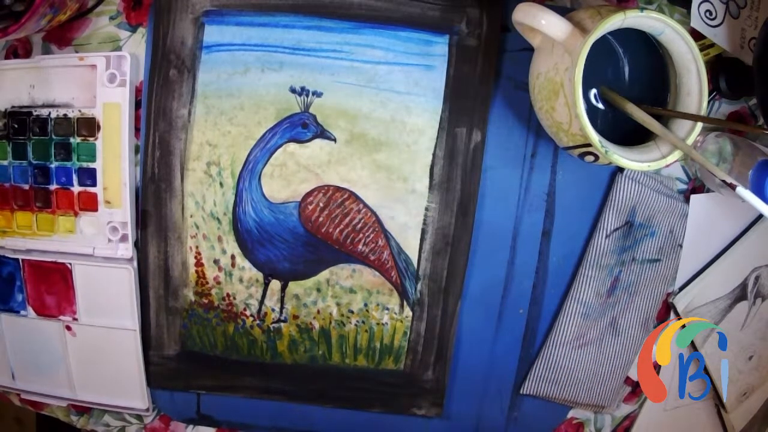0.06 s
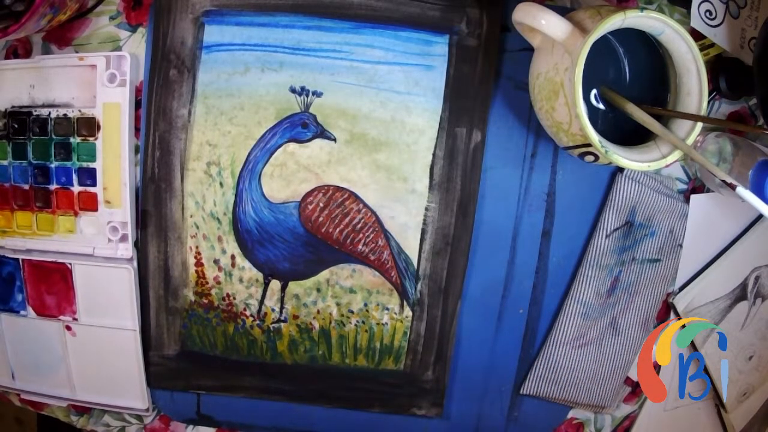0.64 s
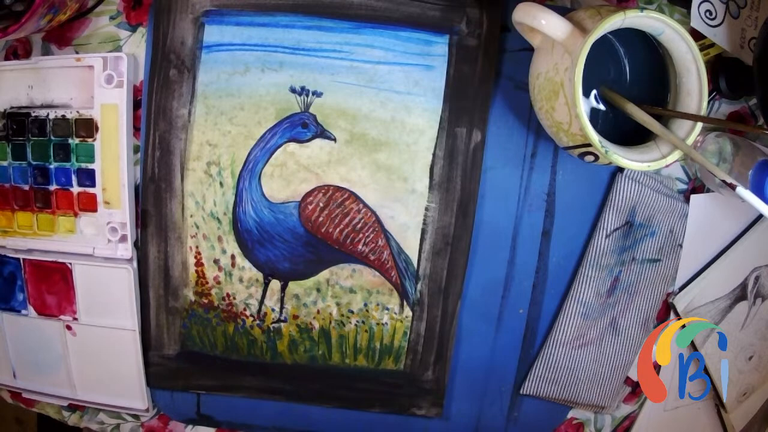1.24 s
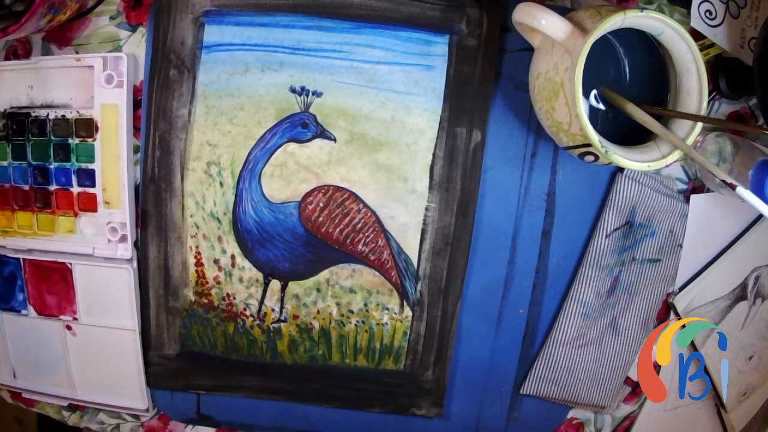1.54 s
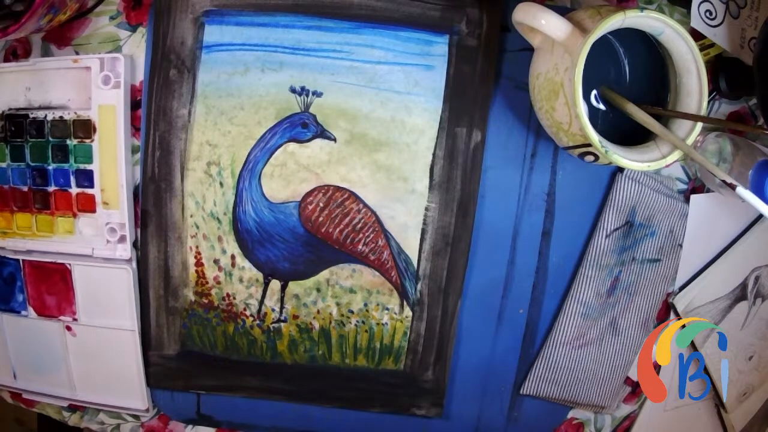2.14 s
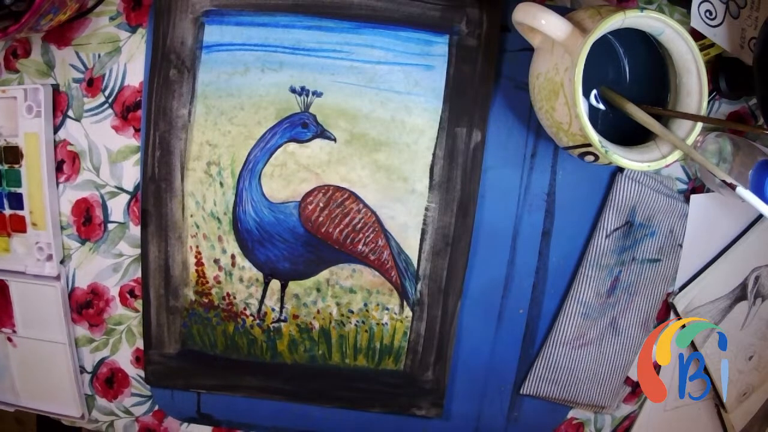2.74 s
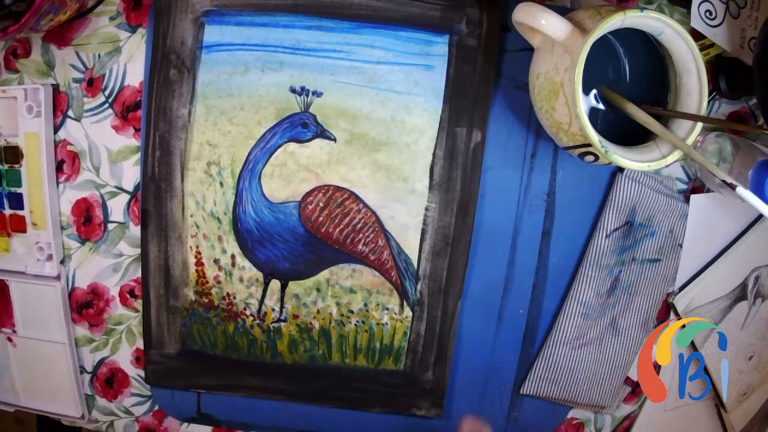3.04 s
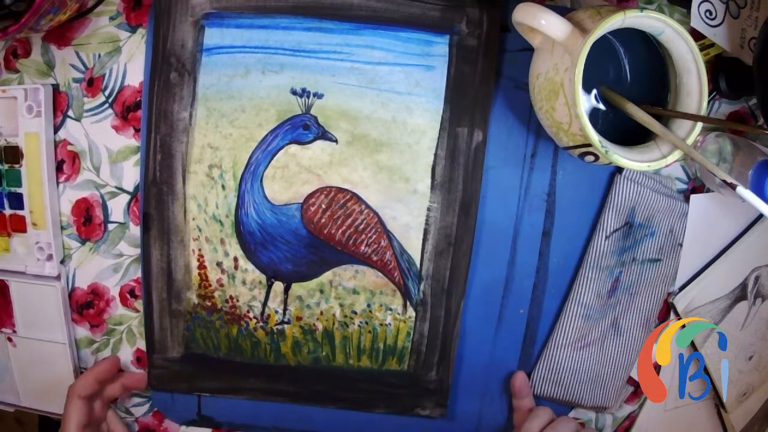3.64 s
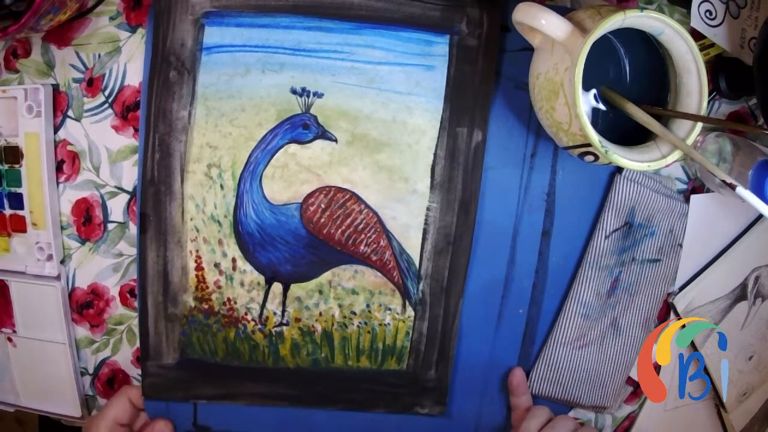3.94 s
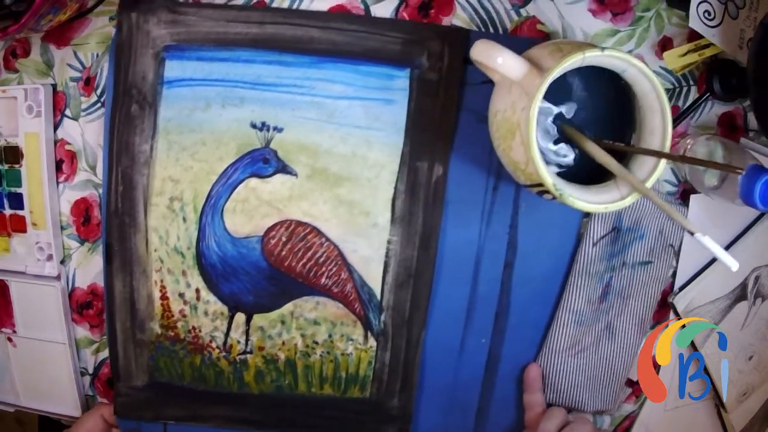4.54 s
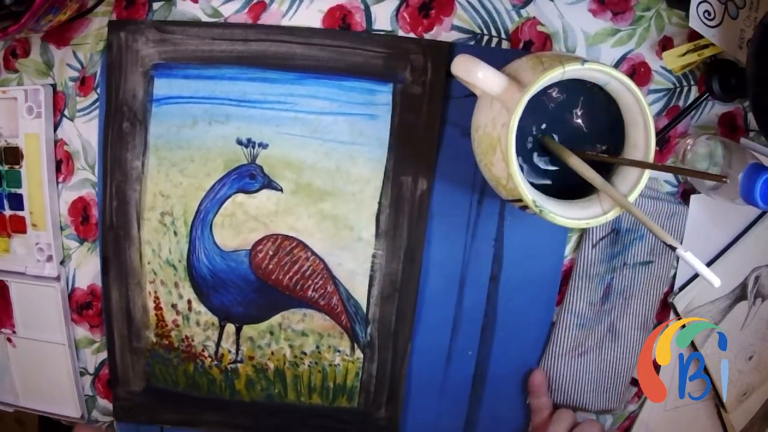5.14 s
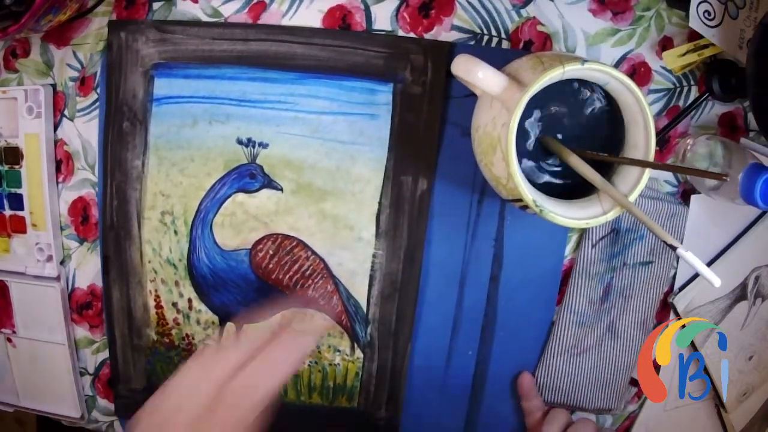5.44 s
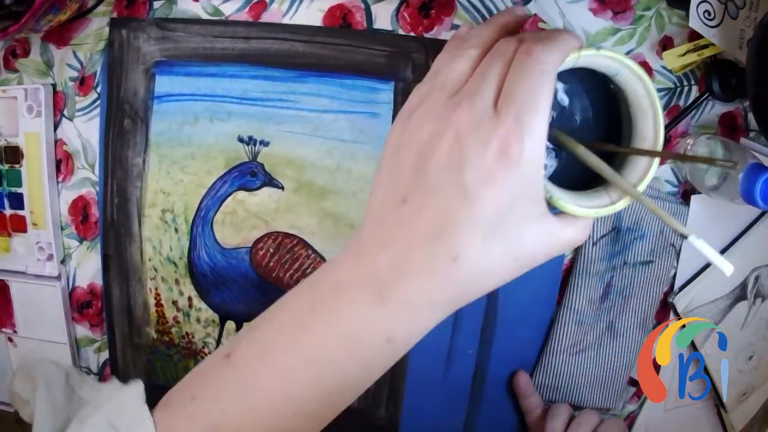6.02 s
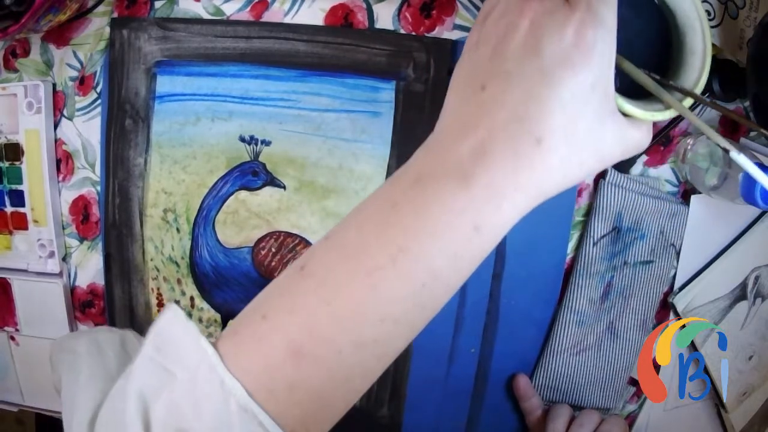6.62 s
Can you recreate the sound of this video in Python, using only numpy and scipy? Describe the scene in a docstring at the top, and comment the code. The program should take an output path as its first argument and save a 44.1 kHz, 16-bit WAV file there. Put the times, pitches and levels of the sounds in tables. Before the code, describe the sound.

Steady low room noise and a faint, thin, rapid chirping run throughout in a small room. At about 0.4 seconds something hollow thumps softly on a cloth-covered table, a faint metal ping follows, and at 0.7 a plastic palette knocks and clicks. Small ticks, finger rubs and a quiet slide continue, with a light tap at 2.5. A wooden board is knocked at 3.2 and 3.4, then slides unevenly over the cloth from 3.9 to 4.8, with sharp taps at 4.4 and 4.6. The pushes sway the microphone stand, adding a deep rumble, strongest around 4.7 and after 6. Cloth rustles at 5.9 as a mug of water is lifted. Brush handles clack against its rim at 6.15, then loudest at 6.3 with a thud. A few small water plops follow around 6.4, and light clicks finish near 6.7.

```python
"""Painting things are moved on a cloth-covered table in a small room, over steady noise and thin chirping.
From the start, each push thuds in the table and sways a springy camera stand. Fingers rub, something
hollow thumps and metal pings; a plastic palette is nudged, then tapped. A wooden board is gripped and
slid, the cloth catching and slipping under it. Last, a mug of water is lifted: brush handles excite
the modes of its rim, and pockets of air ring in the water as plops."""
import sys
import numpy as np
from scipy import signal
from scipy.fft import rfft, irfft
from scipy.io import wavfile

SR = 44100
rng = np.random.default_rng(int(sys.argv[2]) if len(sys.argv) > 2 else 0)


def store_pcm(level_fs):
    """Save levels as 16-bit WAV."""
    pcm = np.round(np.clip(level_fs, -1, 1) * 32767).astype(np.int16)
    wavfile.write(sys.argv[1], SR, np.atleast_2d(pcm).T)


N = 303408
T = np.arange(N) / SR
TOP_HZ = 16200

# Levels are relative within each column.
# spectrum of the room noise: frequency_hz, level_db
ROOM_SPECTRUM = [(60, 5.5), (110, 1.5), (220, -6), (350, -6), (460, -12), (800, -5.5), (1000, -13),
                 (1350, -14), (2000, -26.5), (3300, -31), (5800, -33.5), (9000, -43), (12000, -33.5),
                 (15000, -32)]
# resonances in that noise: centre_hz, width_hz, gain_db
ROOM_RESONANCES = [(400, 110, 0), (523.3, 19, 7.5), (1250, 230, -4.5), (2620, 710, 8.5), (4000, 270, 4)]
# hands pushing on the table: start_s, held_s, sway_db, thud_db
PUSHES = [(0, 0.13, -36, -49), (0.364, 0.17, -42.5, -34), (.716, 0.14, -29.5, -23.5),
          (1.415, 0.12, -44, -40.5), (1.831, 0.023, -46.5, -40), (2.231, 0.13, -36, -45.5),
          (2.678, 0.036, -40, -54), (3.191, 0.065, -36.5, -27), (3.341, 0.1, -34, -46),
          (3.926, 0.13, -31, -46), (4.059, 0.13, -24, -32.5), (4.33, 0.11, -22.5, -42),
          (4.703, 0.07, -16.5, -37), (5.61, 0.044, -42.5, -62), (5.801, 0.044, -39.5, -59),
          (6.09, 0.022, -23, -23), (6.303, 0.031, -20.5, -19.5)]
# spectrum of the table's rumble: frequency_hz, level_db
RUMBLE_SPECTRUM = [(20, -7.5), (55, -8), (80, -14.5), (130, 0.5), (250, -20), (600, -34.5), (2000, -105.5)]
# knocks on board and table: start_s, level_db, cutoff_hz, contact_s
KNOCKS = [(.3595, -44.5, 710, 0.0018), (0.7125, -36, 1380, 0.00062), (0.723, -39.5, 1200, 0.0062),
          (0.741, -37, 3000, 0.0061), (1.501, -43, 400, 0.071), (3.1832, -30.5, 820, 0.0021),
          (3.196, -27.5, 302, 0.01), (3.398, -35.5, 1700, 0.018), (3.417, -36, 1100, 0.016),
          (4.37, -44, 2500, .001), (4.404, -43, 2500, 0.00082), (4.6143, -39, 3000, .00042),
          (4.6354, -37, 2200, 0.001), (4.699, -41, 1780, 0.00081), (4.753, -45.5, 2000, .00064),
          (6.057, -39.5, 1310, 0.0091), (6.149, -42, 300, .004), (6.309, -28.5, 498, 0.012)]
# palette and board sliding on cloth, and the noisy fading tails after the palette knock
# and the loud mug clack: start_s, held_s, body_db, hiss_db
SLIDES_AND_TAILS = [(.56, 0.16, -66, -76.5), (.725, 0.053, -49.5, -81), (1.98, 0.65, -70.5, -81),
                    (3.6, 0.064, -69, -73), (3.9, 0.17, -57, -71.5), (4.02, 0.13, -54, -72.5),
                    (4.13, 0.26, -62.5, -77.5), (4.32, 0.16, -57.5, -72.5), (4.59, 0.16, -56.5, -72),
                    (4.8, 0.26, -71, -83.5), (5.58, 0.25, -72, -81), (5.92, .36, -54, -72),
                    (6.3, 0.15, -56.5, -63.5), (6.55, 0.14, -62, -76.5), (6.821, 0.08, -63, -80)]
# low and high spectra of that noise: frequency_hz, level_db
BODY_SPECTRUM = [(60, 27.5), (150, 18.5), (300, 6.5), (600, -0.5), (1200, 1.5), (2100, -1.5), (3500, -7.5),
                 (6000, -27), (10000, -34.5)]
HISS_SPECTRUM = [(2000, -3.5), (4000, 8.5), (6000, 6.5), (9000, 7), (12000, -0.5), (15500, -7.5)]
# strokes of fingers and sleeve: middle_s, level_db, centre_hz, half_length_s
RUBS = [(0.336, -66.5, 784, 0.064), (1.033, -64, 1040, 0.031), (1.512, -59, 745, 0.069),
        (1.71, -66, 900, 0.02), (1.84, -66, 1400, 0.0085), (3.306, -68, 2190, .03), (3.4, -56, 1960, 0.015),
        (3.64, -65.5, 1990, 0.062), (3.682, -61.5, 1570, 0.032), (3.767, -69, 2140, 0.015),
        (5.97, -56, 255, 0.027), (6.034, -59, 1970, 0.057)]
# ticks of palette, board edge and small things: start_s, level_db, centre_hz, decay_s
TICKS = [(0.743, -34.5, 4300, 0.0042), (0.755, -36.5, 3600, 0.0062), (0.774, -53, 3480, 0.014),
         (1.592, -42, 5900, 0.0013), (1.605, -51, 6000, 0.0024), (1.71, -56.5, 9000, 0.0031),
         (1.834, -52, 7240, 0.0075), (2.103, -58, 12000, 0.0018), (2.797, -57, 8900, 0.0014),
         (3.194, -56.5, 4030, .008), (3.406, -57.5, 8000, 0.025), (4.074, -44.5, 5000, 0.003),
         (4.3675, -27.5, 1200, 0.0042), (4.369, -41, 5970, 0.0019), (4.615, -20.5, 1090, 0.0022),
         (4.6158, -32.5, 5450, 0.0013), (4.632, -22.5, 1090, 0.0037)]
# air pockets in the water: start_s, level_db, settled_pitch_hz, start_pitch_hz, t60_s
PLOPS = [(4.6912, -34.5, 1840, 1800, 0.015), (6.377, -24, 960, 1490, 0.033),
         (6.4121, -32.5, 966, 1880, 0.085), (6.4493, -33.5, 1030, 1110, 0.041),
         (6.4709, -35.5, 990, 1190, 0.029)]
# brush handles striking the mug: start_s, level_db, treble_gain_db, chatter_s
CLACKS = [(6.1475, -20.5, 1.5, 0.0024), (6.1505, -18.5, -24, 0.0039), (6.1563, -14, -22, 0.00055),
          (6.18, -32, -13, 0.00097), (6.2786, -22, -20.5, 0.00082), (6.3072, -5.5, 0.5, 0.00029),
          (6.4197, -27.5, 6, 0.0014), (6.438, -35, -4.5, 0.0017), (6.462, -46, -0.5, 0.0019),
          (6.6835, -40, 7, 0.0033), (6.691, -43, -0.5, 0.0025)]
# normal modes of each struck body: frequency_hz, level_db, t60_s
BOARD_MODES = [(84.4, -3, 0.19), (134.6, -6.5, 0.24), (177, -3.5, 0.06), (260.7, -4.5, 0.1),
               (384, -2.5, 0.048), (596, -3, 0.025), (830, -8.5, 0.051), (1060, 1, 0.016),
               (1277, -4.5, .028), (1502, -8, 0.034), (1968, -6, 0.048), (2520, -15.5, 0.015),
               (2706, -8, 0.064), (4444, -12, 0.015)]
HOLLOW_MODES = [(296, 9, 0.095), (337, 0.5, 0.32), (384, 5.5, 0.19), (476, 3, 0.064), (560, -7, 0.046)]
METAL_MODES = [(3060, -14, 0.47), (3560, -7.5, 0.25), (4750, -9.5, 0.4), (6630, -2, 0.11),
               (8242, 5.5, 0.13), (9916, -12, 0.16), (11600, -14, 0.11)]
PALETTE_MODES = [(1095, 2, 0.056), (1260, 1, 0.046), (1555, -4, 0.03)]
MUG_MODES = [(582, -21, 0.1), (646, -24.5, 0.098), (947, -21, 0.064), (1615, -5.5, 0.021),
             (1802, -10, 0.041), (1960, -31.5, 0.084), (2254, -12.5, 0.041), (2784, -24, 0.064),
             (2990, -23.5, 0.04), (3570, -23, 0.041), (4080, -13.5, 0.0086), (4702, -9, 0.007),
             (4930, -3.5, 0.0082), (5403, -6.5, 0.0098), (5880, -32.5, 0.047), (6490, -2.5, 0.014),
             (6900, -13.5, 0.013), (7490, -9.5, 0.0065), (8090, -0.5, 0.0077), (9060, -11.5, 0.026),
             (9200, -6.5, 0.012), (10020, -11, 0.017), (10930, -18.5, 0.022), (11980, -13.5, 0.011),
             (13326, -19.5, 0.01), (14387, -23, 0.014), (15300, -17, 0.009)]


def undb(db):
    """Decibels to amplitude ratio."""
    return 10 ** (np.asarray(db) / 20)


def unit(x):
    """Normalisation to rms 1."""
    return x / np.sqrt(np.mean(x ** 2))


def add(out, start_s, x):
    """Superposition: x joins out at start_s."""
    i = int(start_s * SR)
    out[i:i + len(x)] += x[:N - i]


def colour(x, spectrum):
    """Spectral shaping, to rms 1."""
    hz, db = np.transpose(spectrum)
    bins_hz = np.maximum(np.fft.rfftfreq(len(x), 1 / SR), 1)
    gain = undb(np.interp(np.log(bins_hz), np.log(hz), db))
    return unit(irfft(rfft(x) * gain, len(x)))


def band(x, hz, width_hz):
    """A single resonance, gain 1 at its centre."""
    quality = hz / min(width_hz, SR / 3)
    return signal.lfilter(*signal.iirpeak(min(hz, SR / 2 - 1000), quality, fs=SR), x)


def lowpass(x, hz):
    """Second-order low-pass."""
    return signal.sosfilt(signal.butter(2, min(hz, TOP_HZ), fs=SR, output="sos"), x)


def ring(modes, scatter_db=0.5):
    """Free vibration: a sum of damped modes, weighted a little differently by each blow."""
    hz, db, t60 = np.transpose(modes)[:, :, None]
    t = T[:SR // 2]
    polarity = (-1) ** np.arange(len(hz))[:, None]
    amplitude = polarity * undb(db + scatter_db * rng.standard_normal(hz.shape))
    return np.sum(amplitude * np.exp(-np.log(1000) * t / t60) * np.sin(2 * np.pi * hz * t), axis=0)


def burst(decay_s):
    """Exponentially decaying noise."""
    t = T[:SR // 4]
    return rng.standard_normal(len(t)) * np.exp(-t / decay_s)


def contact(decay_s, rough):
    """Impact force: one impulse, then tiny rebounds."""
    force = burst(decay_s)
    force *= rough / np.linalg.norm(force)
    force[0] += 1
    return force / np.hypot(1, rough)


def envelope(start_s, held_s, attack_s, fall_db_per_s):
    """Linear rise, hold and exponential decay."""
    rise = np.clip((T - start_s) / attack_s, 0, 1)
    return rise * undb(-fall_db_per_s * np.clip(T - start_s - held_s, 0, 2))


def room_noise():
    """Stationary noise, coloured by a few resonances."""
    noise = colour(rng.standard_normal(N), ROOM_SPECTRUM)
    peaks = sum(undb(db) * band(noise, hz, width) for hz, width, db in ROOM_RESONANCES)
    return undb(-63) * unit(noise + peaks)


def stand():
    """Damped oscillation: pushes sway the stand at two low resonances; the table rumbles along."""
    swing = undb(-52)  # at rest
    for start_s, held_s, db, _ in PUSHES:
        swing = np.hypot(swing, undb(db) * envelope(start_s, held_s, attack_s=0.019, fall_db_per_s=70))
    force = rng.standard_normal(N)
    sway = band(band(force, 36, 8.8), 41, 12) + undb(-2.5) * band(band(force, 30, 10), 30, 15)
    sway = swing * unit(sway / np.abs(signal.hilbert(sway)))  # swing alone sets the amplitude
    sway = signal.sosfiltfilt(signal.butter(4, 56, fs=SR, output="sos"), sway)
    rumble = colour(rng.standard_normal(N), RUMBLE_SPECTRUM)
    return sway + undb(-49.5) * swing ** 0.58 * rumble


def board(thud_cutoff_hz=150, thud_contact_s=0.021):
    """Impact excitation: knocks raise a crack and brief wooden modes; soft pushes give only a thud."""
    out = np.zeros(N)
    thuds = [(start_s, db, thud_cutoff_hz, thud_contact_s) for start_s, _, _, db in PUSHES]
    for start_s, db, cutoff_hz, contact_s in KNOCKS + thuds:
        wood = ring(BOARD_MODES, scatter_db=1.5)
        crack = undb(2) * lowpass(burst(0.0031), 5500) + undb(4) * lowpass(burst(0.017), 2000)
        add(wood, 0, crack)
        knock = signal.fftconvolve(wood, contact(contact_s, rough=0.59))
        add(out, start_s, undb(db - 6) * lowpass(knock, cutoff_hz))
    return out


def friction_and_tails(jerk_hz=45, jerk_db=0.5, catch_samples=48):
    """Stick-slip friction of cloth under palette and board; the same noise forms two impacts' tails."""
    body, hiss = undb(-81.5), undb(-89)  # faint rustle between moves
    jerks = undb(jerk_db * unit(lowpass(rng.standard_normal(N), jerk_hz)))
    for start_s, held_s, body_db, hiss_db in SLIDES_AND_TAILS:
        gain = jerks * envelope(start_s, held_s, attack_s=0.31 * held_s, fall_db_per_s=196)
        body = np.hypot(body, undb(body_db) * gain)
        hiss = np.hypot(hiss, undb(hiss_db) * gain)
    catches = np.repeat(rng.standard_normal(N // catch_samples + 1), catch_samples)[:N]
    grains = rng.standard_normal((2, N)) * undb(2.5 * catches)
    return (body * undb(7.5) * colour(grains[0], BODY_SPECTRUM)
            + hiss * undb(5) * colour(grains[1], HISS_SPECTRUM))


def chirping(first_s=0.079, period_s=0.0862, pair_gap_s=0.0175):
    """Frequency sweeps: pairs of thin falling chirps repeat over narrow-band hiss."""
    out = undb(-74.5) * unit(band(band(rng.standard_normal(N), 7370, 890), 7400, 1300))
    window = np.hanning(int(0.014 * SR))
    for start_s in np.arange(first_s, N / SR - period_s / 2, period_s):
        for lag_s, db in ((0, -63), (pair_gap_s, -59)):
            detune, jitter, scatter_db = rng.standard_normal(3)
            hz = np.linspace(7500, 6350, len(window)) * (1 + 0.0027 * detune)
            chirp = window * np.sin(2 * np.pi * np.cumsum(hz) / SR)
            add(out, start_s + lag_s + 0.0028 * jitter, undb(db + scatter_db) * chirp)
    return out


def rubs():
    """Friction noise of skin and sleeve swells and fades in one broad resonance."""
    out = np.zeros(N)
    for middle_s, db, hz, half_s in RUBS:
        stroke = unit(band(band(rng.standard_normal(N), hz, 0.35 * hz), hz, 1.8 * hz))
        out += undb(db) * stroke * np.exp(-((T - middle_s) / half_s) ** 2)
    return out


def struck_body(modes, start_s, level_db):
    """Impulse response: a body struck once rings in its normal modes."""
    out = np.zeros(N)
    add(out, start_s, undb(level_db) * ring(modes))
    return out


def ticks():
    """Heavy damping: light contacts give dry, broad bursts of noise."""
    out = np.zeros(N)
    for start_s, db, hz, decay_s in TICKS:
        add(out, start_s, undb(db) * lowpass(band(burst(decay_s), hz, 1.06 * hz), 2.5 * hz))
    return out


def plops():
    """Bubble resonance: a pocket of air rings, gliding quickly to its settled pitch."""
    out, t = np.zeros(N), T[:SR // 4]
    for start_s, db, settled_hz, start_hz, t60 in PLOPS:
        hz = settled_hz + (start_hz - settled_hz) * np.exp(-t * settled_hz / 2)
        tone = np.sin(2 * np.pi * np.cumsum(hz) / SR) * np.exp(-np.log(1000) * t / t60)
        splash = lowpass(band(burst(t60 / 7), start_hz, start_hz), 2 * start_hz)
        add(out, start_s, undb(db) * (tone + undb(-1) * splash))
    return out


def mug(treble_hz=3200):
    """Modal excitation by brush handles: hard contacts reach the rim's high modes, long ones chatter."""
    out = np.zeros(N)
    for start_s, db, treble_db, chatter_s in CLACKS:
        modes = [(hz, gain + treble_db / (1 + (treble_hz / hz) ** 4), t60) for hz, gain, t60 in MUG_MODES]
        rim = signal.fftconvolve(ring(modes, scatter_db=0.56), contact(chatter_s, rough=300 * chatter_s))
        # the wooden handle adds a dry crack and a dull clatter
        crack = undb(treble_db - 6) * lowpass(band(burst(0.0053), 3500, 6600), 11000)
        clatter = undb(-9) * band(band(burst(0.005), 1900, 1000), 1900, 1600)
        add(out, start_s, undb(db) * rim)
        add(out, start_s, undb(db) * (crack + clatter))
    return out


def reverberate(x, wet_db, t60_s, cutoff_hz):
    """Reverberation: wall reflections add an exponentially decaying tail."""
    t = T[:SR // 2]
    decay = np.exp(-np.log(1000) * t / t60_s) * (t > 0.005)
    tail = lowpass(rng.standard_normal(len(t)), cutoff_hz) * decay
    return x + undb(wet_db) * signal.fftconvolve(x, tail / np.linalg.norm(tail))[:N]


def scene():
    """Superposition of all sources; the clacks stir a shorter, brighter tail."""
    handling = board() + ticks()
    handling += struck_body(PALETTE_MODES, start_s=2.469, level_db=-47)
    handling += struck_body(METAL_MODES, start_s=0.564, level_db=-55)
    handling += struck_body(HOLLOW_MODES, start_s=0.359, level_db=-44)
    handling = reverberate(handling + plops() + rubs(), wet_db=-24, t60_s=0.45, cutoff_hz=5000)
    clacks = reverberate(mug(), wet_db=-26, t60_s=0.11, cutoff_hz=9000)
    return (handling + clacks + friction_and_tails() + stand() + room_noise() + chirping())[None]


def record(dry):
    """Hard clipping just under full scale, then band limiting."""
    top_cut = signal.ellip(8, 0.2, 70, TOP_HZ, fs=SR, output="sos")
    return signal.sosfilt(top_cut, np.clip(dry, -0.8, 0.8))


dry = scene()
out = record(dry)
store_pcm(out)
```